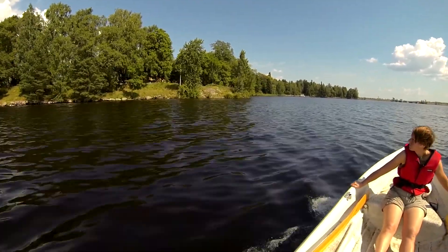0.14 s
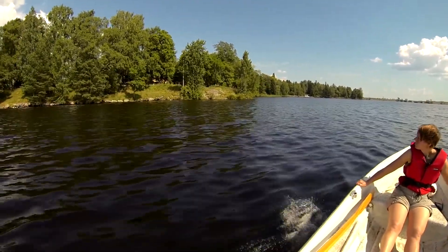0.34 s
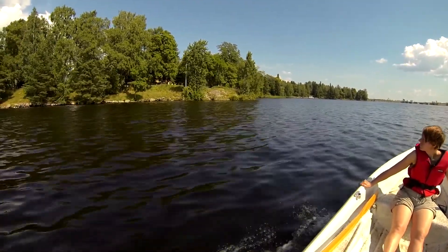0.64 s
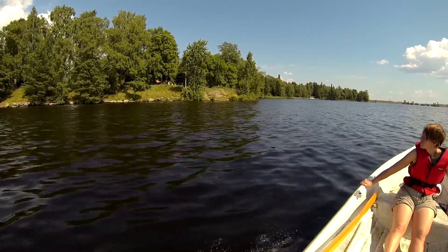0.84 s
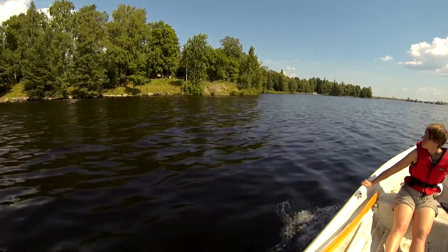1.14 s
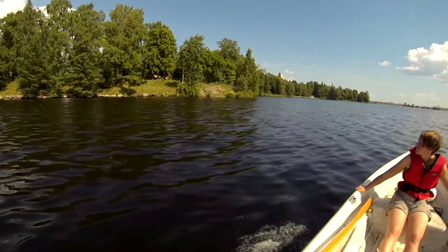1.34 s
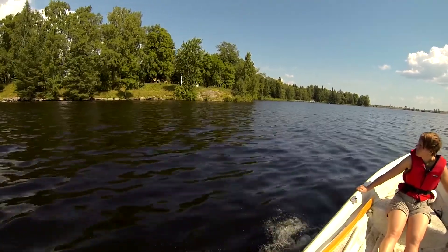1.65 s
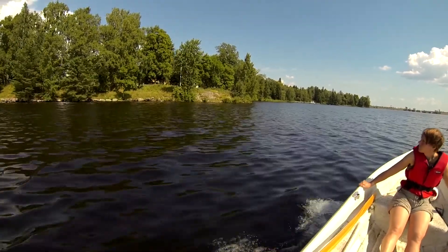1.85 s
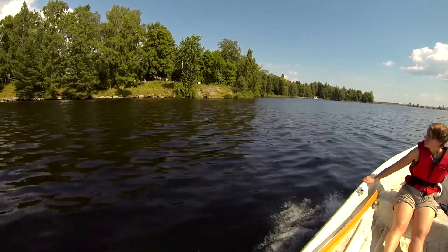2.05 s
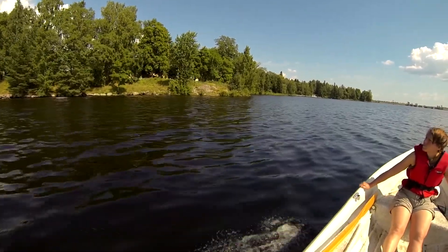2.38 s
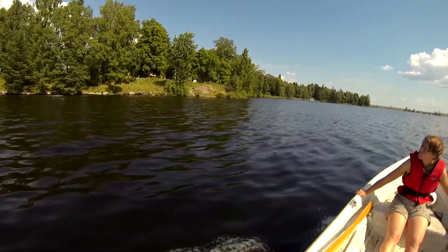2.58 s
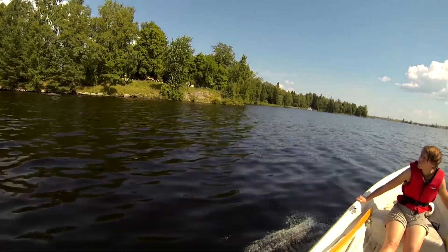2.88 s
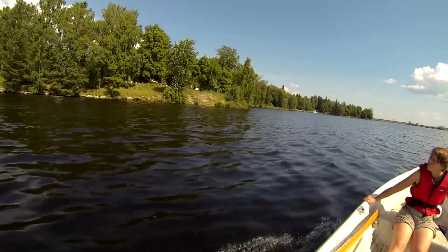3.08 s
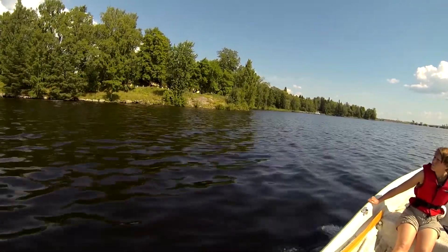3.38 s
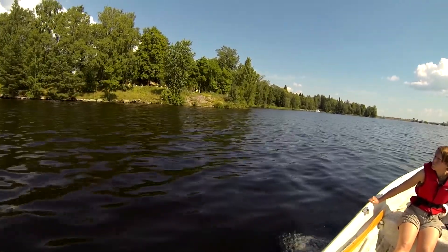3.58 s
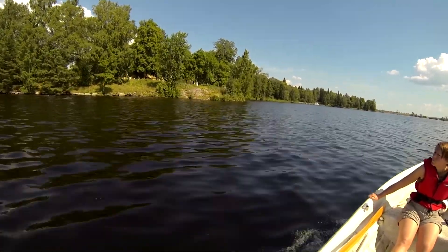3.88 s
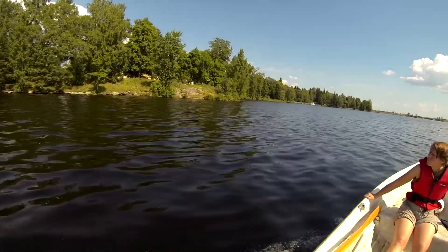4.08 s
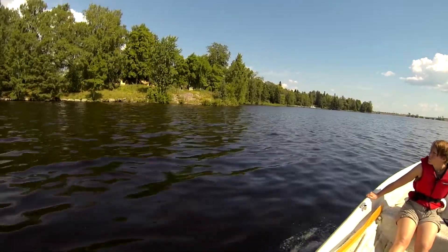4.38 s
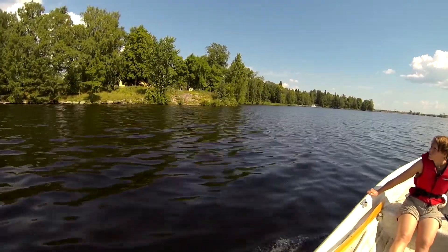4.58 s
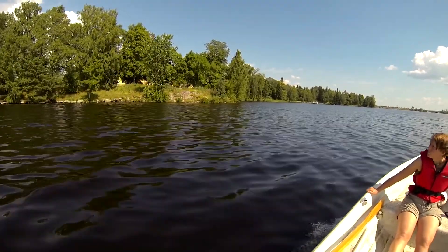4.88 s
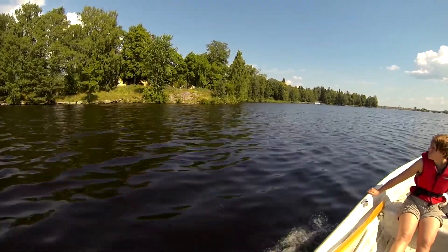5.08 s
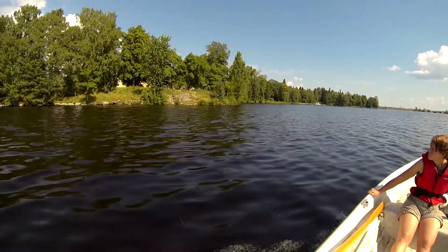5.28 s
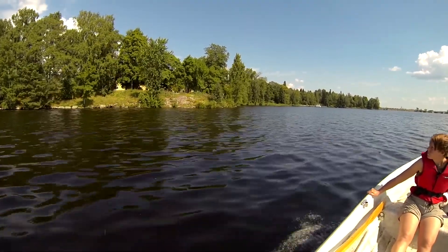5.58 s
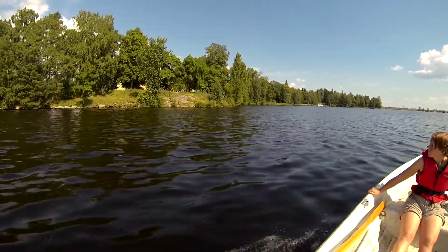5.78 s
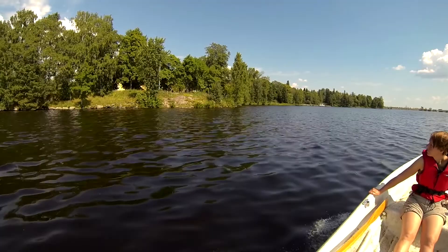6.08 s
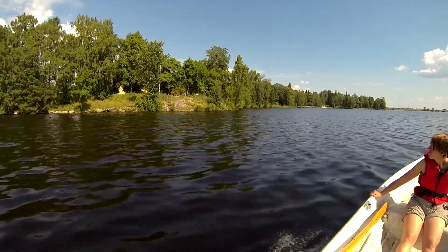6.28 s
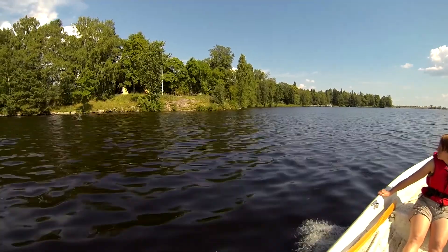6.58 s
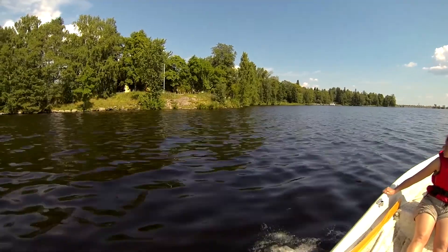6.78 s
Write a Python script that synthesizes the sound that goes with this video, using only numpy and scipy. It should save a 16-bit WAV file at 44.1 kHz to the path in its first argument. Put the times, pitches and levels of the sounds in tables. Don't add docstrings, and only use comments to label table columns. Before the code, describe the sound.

A small four-stroke outboard runs without pause close by, its rapid exhaust beats merging into a rough low drone with hull buzz, metallic valve knocks and fine ticking. Its pitch rises slightly in the first second or so, then holds. Water hisses along the hull, small waves slap the bow several times a second, and light wind bumps a cased microphone on board in the open air.

```python
import sys
import numpy as np
from scipy import signal
from scipy.io import wavfile

SR = 44100
rng = np.random.default_rng(int(sys.argv[2]) if len(sys.argv) > 2 else 0)


def log_audio(samples):
    frames = np.atleast_2d(samples).T
    limited = np.clip(frames, -1, 1)
    pcm = np.round(limited * 32767).astype(np.int16)
    wavfile.write(sys.argv[1], SR, pcm)


def invert_db(x):
    u = np.asarray(x, float) / 20
    return 10 ** u


N = 306054
BLADE, EXHAUST, SHAKE, BLOWS, GAP = .252, .273, .4, .658, .27


def rms_one(x):
    return x / np.sqrt(np.mean(x ** 2) + 1e-20)


def drift(rate):
    r = np.exp(-80 * np.pi * rate / SR)
    slow = signal.lfilter([1], [1, -2 * r, r * r], rng.standard_normal(N // 40 + 2002))[2000:]
    return np.repeat(rms_one(slow), 40)[:N]


def bumps(times, heights, rise_s, fall_s):
    t = np.arange(0, N + 40, 40)[:, None] / SR - times
    bells = np.exp(-.5 * (t / np.where(t < 0, rise_s, fall_s)) ** 2)
    return np.repeat(bells @ heights, 40)[:N]


def band_pass(x, order, edges_hz):
    return signal.sosfilt(signal.butter(order, edges_hz, "band", fs=SR, output="sos"), x)


def resonance(x, hz, width_hz):
    r = np.exp(-np.pi * width_hz / SR)
    poles = [1, -2 * r * np.cos(2 * np.pi * hz / SR), r * r]
    return signal.lfilter((1 - r * r) / 2 * np.array([1, 0, -1]), poles, x)


def strikes(cycle, place, level_db, spread_db, jitter_s):
    due = np.searchsorted(cycle, np.arange(int(cycle[-1])) + place)
    chance = rng.standard_normal((len(due), 2))
    moment = due + (chance[:, 0] * jitter_s * SR).astype(int)
    clicks = np.full(N, 1e-18)
    clicks[np.clip(moment, 0, N - 1)] = invert_db(level_db + spread_db * chance[:, 1])
    return clicks


def contact_lag(place, slow):
    return .012 * (1 + place) * slow


# (time [s], speed [cycles per s])
ENGINE_SPEED = [(0.0, 37.73), (0.64, 38.222), (1.25, 39.353), (1.35, 39.385), (1.48, 39.079),
                (1.68, 39.447), (2.6, 39.207), (3.33, 39.558), (3.66, 39.287), (4.17, 39.575), (4.4, 39.26),
                (4.84, 39.129), (5.41, 39.558), (6.07, 39.453), (6.33, 39.657), (6.79, 39.349),
                (6.94, 39.43)]


def engine():
    s, cycles_per_s = np.transpose(ENGINE_SPEED)
    speed = np.interp(np.arange(N) / SR, s, cycles_per_s)
    return np.cumsum(speed) / SR, np.clip(39.2 - speed, 0, 1)


# (time [s], wash over calm [dB], spray over calm [dB])
BOW_WAVES = [(.1, 1.2, 0), (.23, 2, 4.3), (.46, 3, 2.5), (.63, 1.5, 1.9), (.97, 3, 1.5), (1.13, 1.1, 0.5),
             (1.45, 2, 3), (1.71, 4.5, 2.7), (1.91, -1.4, -1), (2.09, 3.5, 1.5), (2.42, 0.7, 1.5),
             (2.58, 4, 4), (2.761, 3, 3.8), (2.91, 2.5, 1.5), (3.14, 4, 3.3), (3.28, 2.5, 0),
             (3.45, 1.4, 4), (3.65, 3, 2), (3.81, -2.2, .9), (3.97, 1.2, -1), (4.22, 2.5, 2.5),
             (4.54, 4, 1.5), (4.72, 2.5, 1.5), (4.98, -1.5, -1), (5.42, 0.3, -0.8), (5.73, -3, -1.5),
             (5.99, 3.5, 2.7), (6.31, 1.5, 1), (6.68, 3, 2.5)]


def waves():
    s, *heights_db = np.transpose(BOW_WAVES)
    wash_db, spray_db = (bumps(s, db, .056, .056) for db in heights_db)
    return wash_db - wash_db.mean(), spray_db - spray_db.mean()


# (time [s], rise [s], extra crank shake [dB])
BOAT_ROLLS = [(.26, 0.068, 4), (.6, 0.18, 1.5), (.95, 0.18, 2), (1.4, 0.087, 4.5), (1.8, 0.041, 4),
              (2.02, 0.098, 7.5), (3.0, 0.26, 1), (3.4, 0.44, 3.5), (4.25, 0.14, -0.5), (4.62, 0.35, 4.5),
              (5.7, 0.057, 4.5), (6.1, 0.5, 1), (6.88, 0.23, 3.5)]


def rolls():
    s, rise_s, db = np.transpose(BOAT_ROLLS)
    return bumps(s, db, rise_s, .056)


# (time [s], half length [s], depth as loss of the 7th multiple [dB])
OUTLET_DIPS = [
    (1.4, 0.18, 21),
    (2.02, 0.08, 14),
    (2.85, 0.2, 7),
    (3.367, 0.1, 26),
    (4.497, 0.14, 11),
    (5.402, 0.058, 4),
    (6.597, 0.04, 5),
    (.85, 0.079, 1.5),
]


def dips():
    s, half_s, db = np.transpose(OUTLET_DIPS)
    return bumps(s, db, half_s, half_s)


# (multiple of the cycle rate, level [dB rms], wander [dB])
STEADY_TONES = [(3, -32, 4), (4, -34, 2), (8, -26, -0.2), (9, -21.5, 1.73)]
# (multiple, level [dB rms], dip change [dB per dB], roll change [dB per dB], change as the boat settles [dB per s])
DIPPING_TONES = [(5, -24.5, 0.0643, -0.83, -1.5), (6, -22, 0.1568, -0.91, 0.2),
                 (7, -24.5, -1.07, 0.65, -0.02)]


def exhaust(cycle, slow):
    t = np.arange(N) / SR
    roll_db, depth_db = rolls(), dips()
    levels = {k: db + wander_db * drift(3.0) for k, db, wander_db in STEADY_TONES}
    for k, db, dip, roll, settle_db in DIPPING_TONES:
        levels[k] = db + dip * depth_db + roll * roll_db + settle_db * t + 2.5 * drift(6.0)
    beat = np.zeros(N)
    for k, db in levels.items():
        place, slack_rad = (EXHAUST, .3) if k % 3 else (BLADE, .12)
        lag_rad = 1.9 * slow * (k == 7)
        beat -= invert_db(db) * np.cos(2 * np.pi * k * (cycle - place) - lag_rad + slack_rad * drift(8.2))
    strength_db = 1.3 * rng.standard_normal(int(cycle[-1]) + 2)
    uneven = invert_db(np.interp(cycle - EXHAUST + 1, np.arange(len(strength_db)), strength_db))
    shake = invert_db(-24 + roll_db + 0.9 * drift(8.9)) * np.cos(4 * np.pi * (cycle - SHAKE))
    return np.sqrt(2) * (shake + uneven * beat)


# (multiple of the cycle rate, level at full speed [dB rms], extra at the slower start [dB])
HULL_BUZZ = [(10, -37.5, 5), (11.01, -34, -19), (12, -66, 24), (13, -34, -2), (14, -37, 3.5),
             (14.96, -36.5, -1.5), (16, -53, 18), (16.94, -37, 2), (18, -52, 9), (18.6, -35.5, -9),
             (20, -46, 8), (21, -40.5, 6), (22, -58.5, 5.5)]


def buzz(cycle, slow, wash_db):
    swell_db = wash_db - .5 * np.arange(N) / SR
    late = 0.0019 * drift(5.4)
    moment = cycle - BLOWS - contact_lag(BLOWS, slow) + late
    tones = np.zeros(N)
    for k, db, slow_db in HULL_BUZZ:
        sign = np.sign(np.sin(np.pi * GAP * (k - 15.7)))
        level = invert_db(db + slow * slow_db + 2.0 * drift(6))
        tones += sign * level * np.cos(2 * np.pi * (round(k) * moment + .1))
    return np.sqrt(2) * invert_db(0.67 * (swell_db - swell_db.mean())) * tones


# (multiple of the cycle rate, level [dB peak])
GEAR_WHINE = [(35, -42.5), (40, -41.5), (44, -46.5), (70, -51), (74, -51)]


def gears(cycle):
    mesh = 2 * np.pi * (cycle + 0.0018 * drift(4.3))
    return sum(invert_db(db) * np.sin(k * mesh) for k, db in GEAR_WHINE)


# (pitch [Hz], width [Hz], level [dB])
METAL_PARTS = [(1016, 118, -29), (1105, 135, -25.5), (1770, 540, -33.5), (2970, 1000, -37.5)]
# (place in the cycle [0-1], level into each of the four parts in turn [dB])
VALVE_KNOCKS = [
    (.165, -14, -14, -2, -7),
    (.46, 0, 0, -2.5, -1),
    (.735, -18, -18, -2, -10),
    (.813, -9, -9, -9, -12),
]


def valves(cycle, load_db, slow):
    late = 0.0021 * drift(2.8)
    out = np.zeros(N)
    for part, (hz, width_hz, db) in enumerate(METAL_PARTS):
        lead = .014 * (part < 2)
        clicks = np.zeros(N)
        for place, *levels_db in VALVE_KNOCKS:
            moment = cycle + late + lead - contact_lag(place, slow)
            clicks += strikes(moment, place, db + levels_db[part], 1.5, .00005)
        ring = resonance(resonance(clicks, hz, width_hz), hz, width_hz)
        out += ring * SR / width_hz
    soft = signal.butter(4, 4200, fs=SR, output="sos")
    return invert_db(.5 * load_db - .5 * slow) * signal.sosfilt(soft, out)


# (place in the cycle [0-1], bright level [dB], dull level [dB])
TAPPET_TICKS = [
    (.14, -56.5, -55),
    (.211, -56, -63),
    (.48, -61, -65),
    (.73, -54.5, -63),
    (.803, -56, -59),
]


def tappets(cycle, spray_db):
    out = np.zeros(N)
    for column, edges_hz in ((1, [10600, 15300]), (2, [5000, 9000])):
        clicks = sum(strikes(cycle, row[0], row[column], 2.0, .0002) for row in TAPPET_TICKS)
        fading = signal.lfilter([1], [1, -.9], clicks * invert_db(1.3 * spray_db))
        out += band_pass(fading * rng.standard_normal(N), 4, edges_hz)
    return invert_db(15.5) * out


# (pitch [Hz], level [dB per Hz])
WASH_COLOUR = [(45, -7.5), (110, -5), (250, 4), (400, 0), (480, -9), (880, -6), (1130, -14), (1350, -12.5),
               (1900, -8.5), (2500, -22), (3900, -20.5), (5200, -30), (7400, -46), (13500, -44)]


def wash_level(hz):
    hz_points, db_points = np.transpose(WASH_COLOUR)
    return np.interp(np.log(hz), np.log(hz_points), db_points)


def wash(cycle, wash_db, extra_spray_db):
    out, together = np.zeros(N), drift(9)
    edges = 40 * 2 ** np.arange(0, 8.8, 1 / 3)
    white = rng.standard_normal((2, N))
    breath = np.cos(4 * np.pi * (cycle - .25)) + .3 * np.cos(2 * np.pi * (cycle - .8))
    for k, (low, high) in enumerate(zip(edges, edges[1:])):
        band = band_pass(white[k % 2], 2, [low, high])
        bright = np.clip(np.log2(low / 700) / 3, 0, 1)
        flutter_db = 1.15 * drift(44) + bright * (0.5 * together + 1.86 * breath)
        flutter_db += bright ** 3 * extra_spray_db
        if low < 450:
            flutter_db += 2.0 * np.cos(2 * np.pi * (cycle - EXHAUST))
        out += invert_db(wash_level(np.sqrt(low * high)) + flutter_db + wash_db) * band
    return invert_db(-22.5) * rms_one(out)


def droplets(wash_db):
    born = rng.random(N) < 900 / SR
    strength_db = 5.5 * np.minimum(rng.exponential(1, N), 2.5)
    drops = born * invert_db(strength_db + wash_db)
    pitches, dealt = np.geomspace(2500, 12000, 7), rng.integers(0, 7, N)
    out = np.zeros(N)
    for k, hz in enumerate(pitches):
        out += invert_db(wash_level(hz) - 16.0) * resonance(drops * (dealt == k) + 1e-18, hz, 150.0)
    return out


# (time [s], level over calm [dB])
WIND_GUSTS = [(0.42, 1), (1.14, 14), (1.41, 8), (1.64, 16), (1.86, 17), (2.62, 7), (4.06, 12), (4.26, 20.5),
              (4.48, 3), (5.57, 10), (5.86, 10), (6.03, 7), (6.34, 14), (6.59, 3), (6.82, 8)]


def wind():
    s, db = np.transpose(WIND_GUSTS)
    wind_db = -41 + bumps(s, db, .044, .044) - drift(5.5)
    return invert_db(wind_db) * rms_one(band_pass(rng.standard_normal(N), 2, [16, 52]))


def scene():
    cycle, slow = engine()
    wash_db, spray_db = waves()
    motor = exhaust(cycle, slow) + buzz(cycle, slow, wash_db) + gears(cycle)
    motor += valves(cycle, wash_db, slow) + tappets(cycle, spray_db)
    water = wash(cycle, wash_db, spray_db - wash_db) + droplets(wash_db)
    return (motor + water + wind())[None]


# (pitch [Hz], width [Hz], level [dB])
CASE_CAVITIES = [(4480, 810, -7.5), (7230, 2600, -5.5), (8020, 710, -5), (8740, 250, 6), (9930, 690, -4.5),
                 (13000, 520, -13), (14200, 700, -5)]


def microphone_case(x):
    for hz, width_hz, db in CASE_CAVITIES:
        x = x + (invert_db(db) - 1) * resonance(x, hz, width_hz)
    return x


def low_pass(x):
    return signal.sosfilt(signal.butter(12, 15740, fs=SR, output="sos"), x)


def record(dry):
    x = microphone_case(1.542 * np.tanh(dry / 1.453))
    x = signal.sosfilt(signal.butter(4, 13500, fs=SR, output="sos"), x)
    x = signal.sosfilt(signal.ellip(10, .5, 60, 15250, fs=SR, output="sos"), x)
    return low_pass(x)


dry = scene()
out = record(dry)
log_audio(out)
```